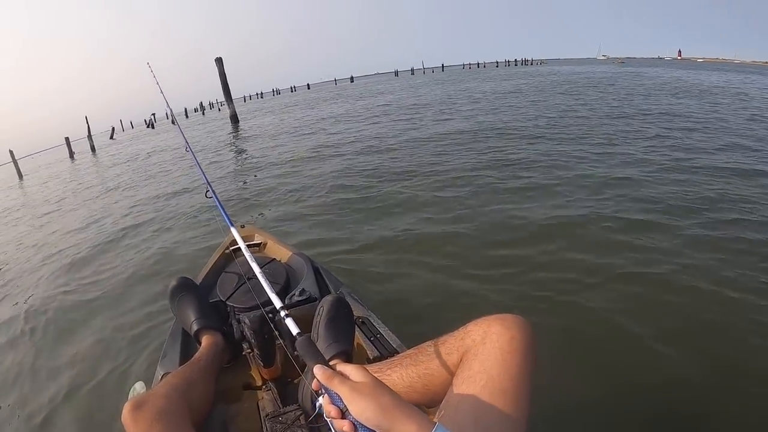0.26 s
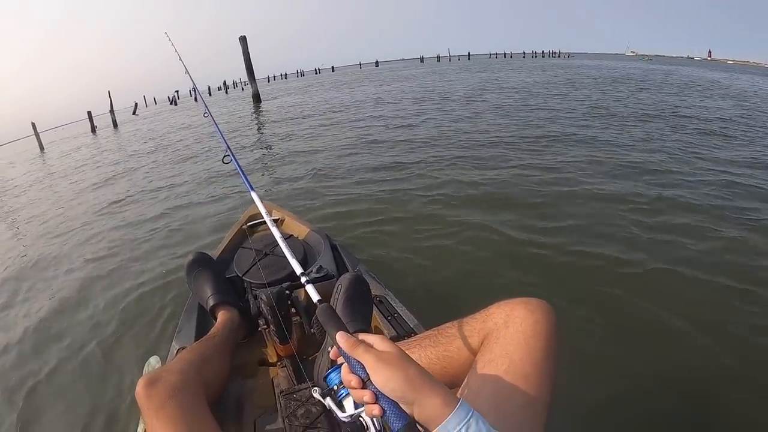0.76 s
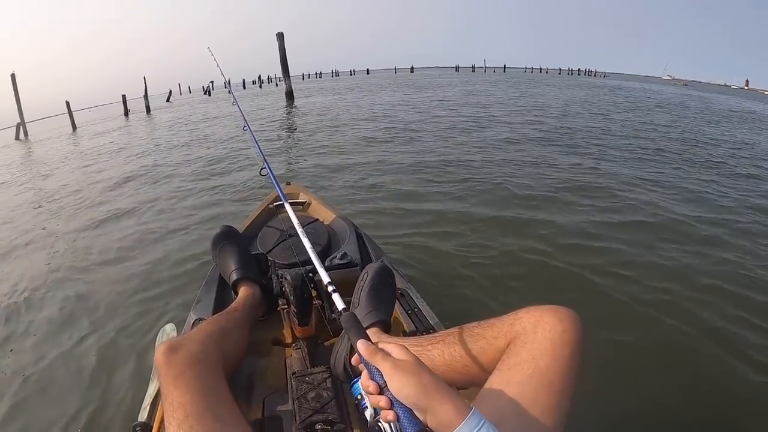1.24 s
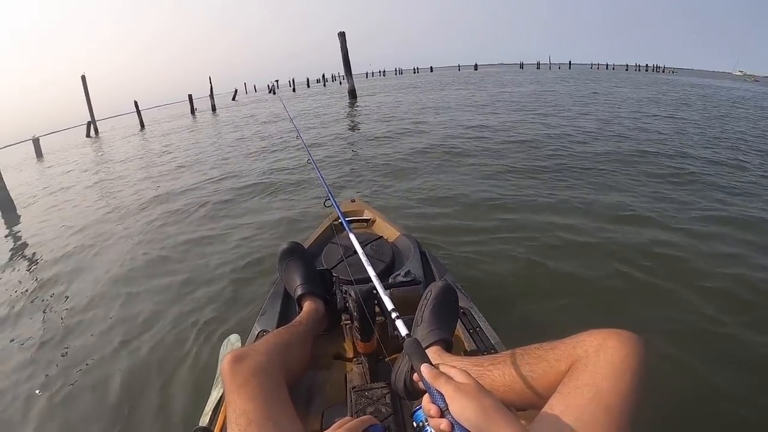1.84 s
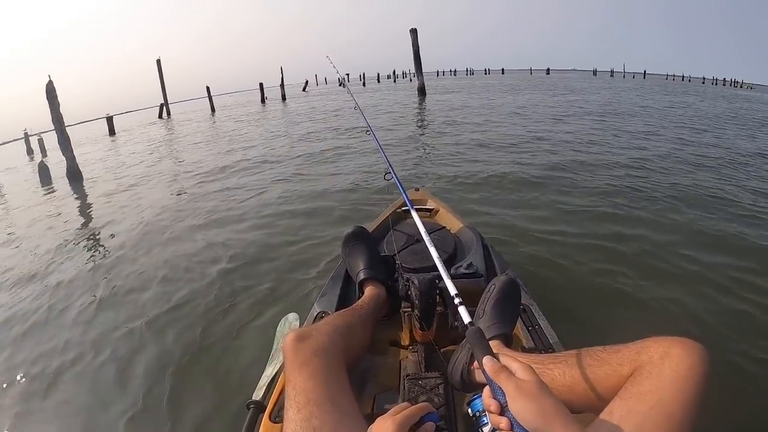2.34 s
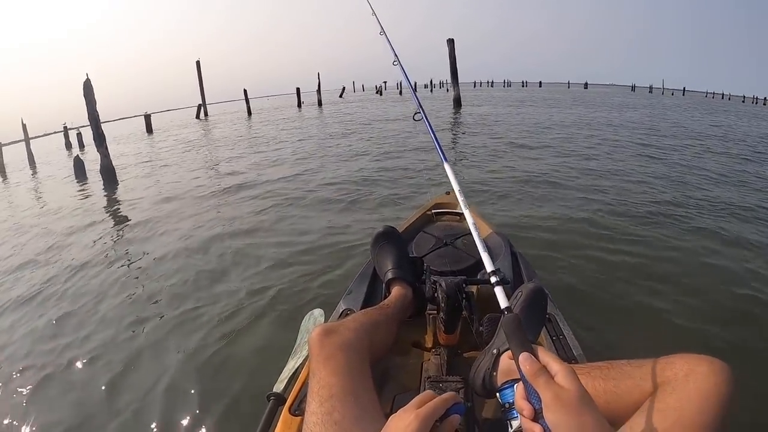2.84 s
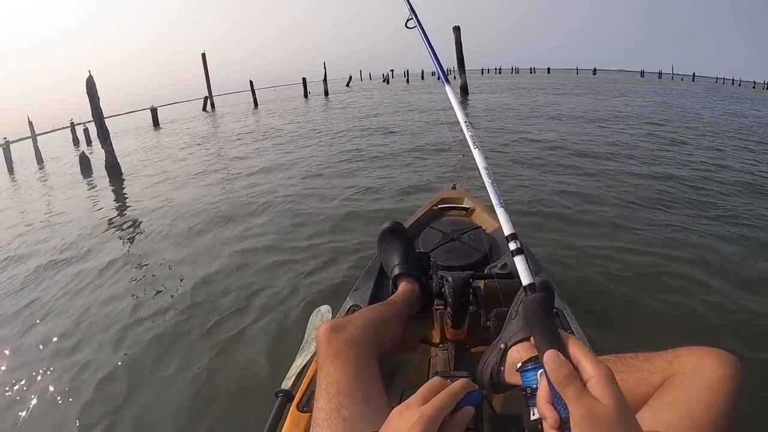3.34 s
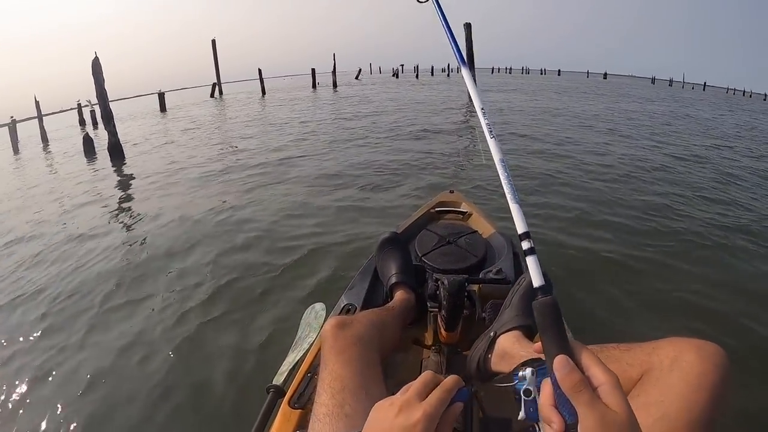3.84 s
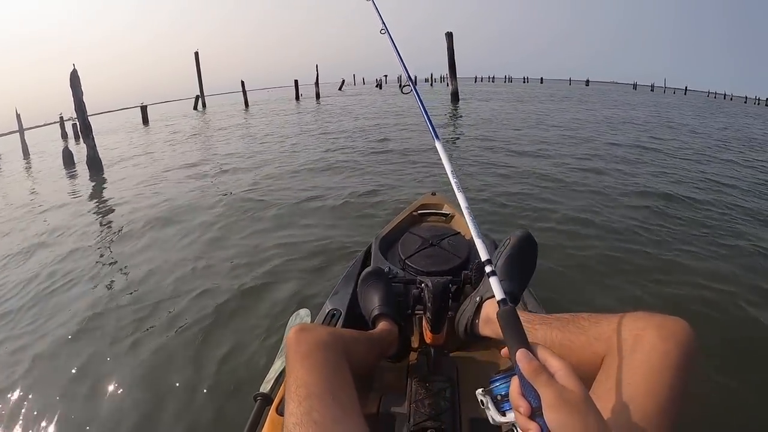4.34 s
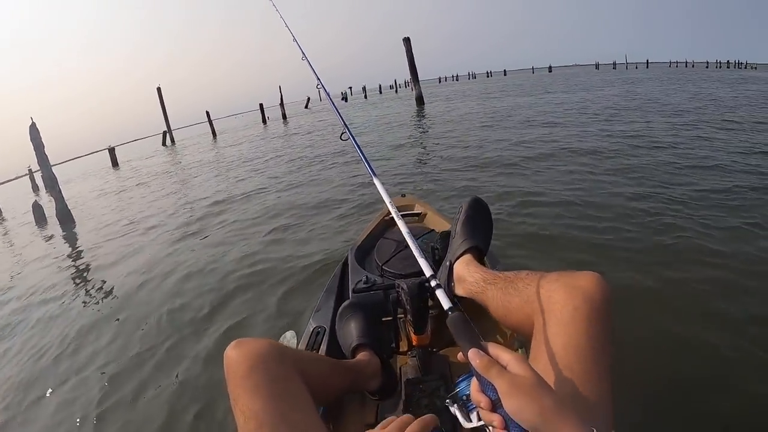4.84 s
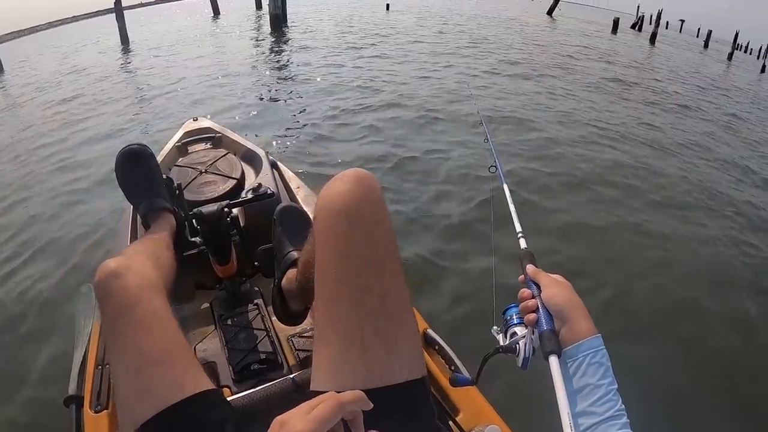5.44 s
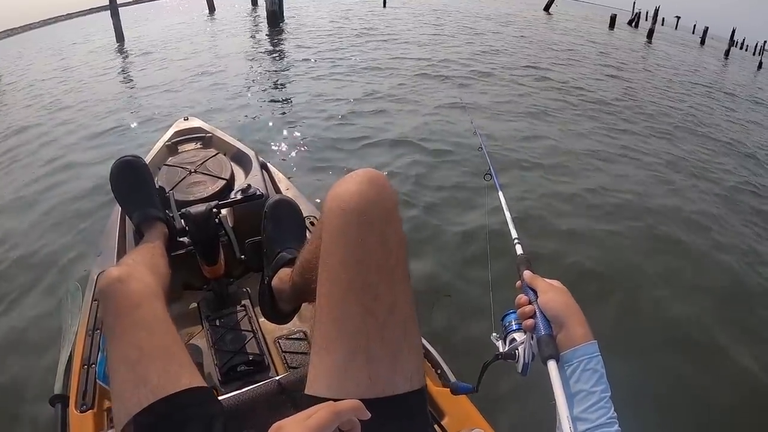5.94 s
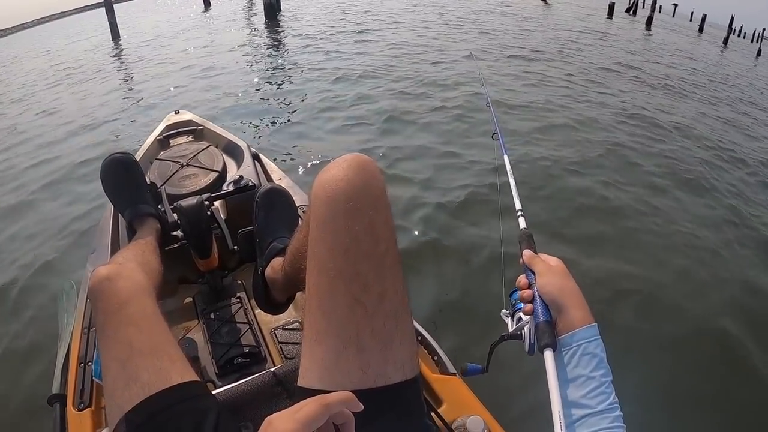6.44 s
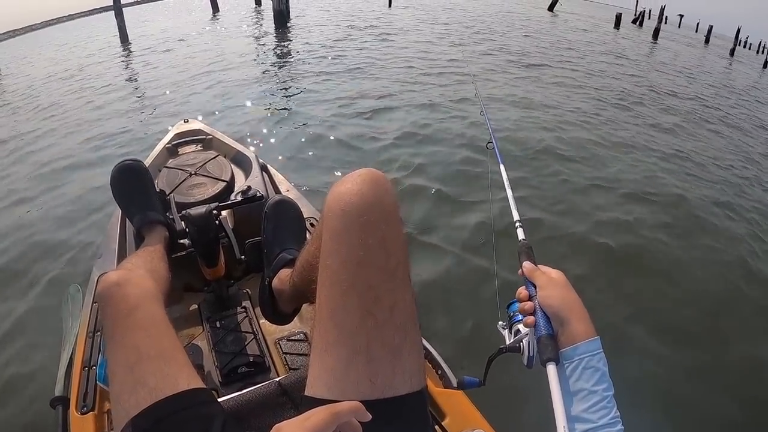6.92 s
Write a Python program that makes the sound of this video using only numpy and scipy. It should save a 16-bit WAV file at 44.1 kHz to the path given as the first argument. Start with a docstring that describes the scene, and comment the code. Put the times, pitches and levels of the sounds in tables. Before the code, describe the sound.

Shrill terns trill and rasp over open water while a shorebird pips steadily, wind rumbles low on the microphone and ripples lap a kayak.

```python
"""Shrill terns call throughout: held notes and trills, whose two voices mix into sum tones and a rasp.
Nasal gulls (filtered harmonics) join after a second; then a whistle swells into a shorebird's sliding pips.
The wind (low noise) drops near 6 s; at the end, throat pulses squawk and a clear tone follows.
All along, bird echoes return from pilings, noisy ripples lap a kayak hull, gear ticks as short
resonant bursts and a far motor hums on two lines."""
import sys
import numpy as np
from scipy import signal
from scipy.fft import rfft, irfft
from scipy.io import wavfile
from scipy.ndimage import uniform_filter1d

SR = 44100
rng = np.random.default_rng(int(sys.argv[2]) if len(sys.argv) > 2 else 0)


def wav_out(sig):
    """Save sig, one row per channel (or a flat mono array), as 16-bit PCM at SR to the path in sys.argv[1]."""
    wavfile.write(sys.argv[1], SR, np.round(np.clip(np.atleast_2d(sig).T, -1, 1) * 32767).astype(np.int16))


N = 316638
TIME_S = np.arange(N) / SR
TOP_HZ = 15700

# Breeze on the microphone. Each row: time in seconds, level before gusts and buffets in dB.
WIND = [(0, -29), (.45, -30.5), (1.5, -30.5), (2.3, -32), (2.7, -29), (4.0, -29.5), (4.8, -31),
        (5.45, -30.5), (5.9, -33.5), (6.1, -38.5), (7.18, -39.5)]
# Wind spectrum. Each row: frequency in Hz, relative density in dB.
WIND_COLOUR = [(18, 17.5), (30, -3), (50, -4.5), (100, -15.5), (200, -30.5), (400, -39), (900, -69.5)]
# Single gusts. Each row: time in seconds, peak above the breeze in dB.
GUSTS = [(.09, 4.5), (.76, 3.5), (1.2, 4.5), (1.72, 5), (2.7, 2), (4.58, 4.5), (5.02, 4.5)]
GUST_S, BUFFETS_PER_S, BUFFET_DB = .06, 12, 1.1

# Ripple spectrum. Each row: frequency in Hz, relative density in dB.
WATER_COLOUR = [(45, 4), (85, 8), (170, -1), (300, -10.5), (600, -16), (1000, -23.5), (1600, -26),
                (2500, -34), (5000, -39), (9000, -39.5), (16000, -37)]
# Hull resonances. Each row: frequency in Hz, width of the first pass in Hz, relative level in dB.
HULL = [(234, 45, 3.5), (319, 64, -3.5), (437, 73, -5), (530, 91, -15)]
# Far motor. Each row: time in seconds, mean level of the lower line in dB, of the upper line in dB.
MOTOR = [(0, -58.5, -62.5), (1.2, -56.5, -74), (2.2, -53.5, -75.5), (3.8, -58, -64), (5.1, -53, -60.5),
         (5.6, -54, -56), (6.4, -56.5, -58), (7.18, -56.5, -62)]
# Knocks, ticks and scuffs of gear and feet. Each row: peak time in seconds, rise in seconds,
# decay in seconds, centre in Hz, width of each of two passes in Hz, level in dB.
KNOCKS = [(.19, 0.037, .03, 5000, 6000, -59), (.312, 0.0032, 0.0085, 273, 195, -41),
          (.312, 0.0028, 0.0087, 1110, 1200, -53.5), (.64, 0.0012, 0.0036, 2480, 4000, -60),
          (1.237, .004, .035, 320, 160, -53), (2.065, 0.00091, .003, 2500, 2500, -56),
          (2.341, .001, .003, 8000, 8000, -65), (3.524, 0.04, .015, 4400, 6000, -59),
          (3.561, 0.0034, 0.012, 700, 910, -49), (3.64, .001, .003, 4000, 5000, -58.5),
          (4.099, 0.0054, 0.013, 4000, 1700, -52), (5.31, 0.0019, 0.017, 265, 170, -41.5),
          (5.976, 0.0044, .025, 199, 91.5, -45.5), (6.021, .001, 0.0033, 5000, 6000, -61)]
# Sleeve brushing as the rod moves. Each row: time in seconds, mean level in dB.
SLEEVE = [(0, -68), (2.5, -72), (4.4, -70.5), (5.0, -68.5), (5.3, -63), (5.6, -66.5), (5.88, -66),
          (6.06, -75), (7.18, -71.5)]

# Bird distance; far birds have more echo. Each row: time in seconds, relative echo level in dB.
DISTANCE = [(.3, -16), (1.0, -12), (1.7, -6), (3.3, -9.5), (5.4, -9.5), (6.7, -16)]
POST_ECHO_S, POST_ECHO_DB = .053, -7.5  # nearest piling, dB relative to the scattered echoes

# Nasal gull notes. Each row: start in seconds, length in seconds, first, middle and last pitch in Hz,
# level in dB, throat resonance in Hz.
GULL_NOTES = [(0.915, 0.022, 1180, 1330, 1380, -60.5, 1500), (1.412, 0.027, 1430, 1420, 1570, -65, 1800),
              (5.251, 0.017, 1213, 1314, 1296, -49, 3480), (5.307, 0.021, 1328, 1300, 1306, -41, 3630),
              (5.473, 0.053, 1270, 1194, 1116, -43, 3700), (6.517, .096, 990, 1210, 930, -60, 2750),
              (7.151, 0.045, 980, 988, 1018, -50.5, 3160)]
# Faint far mews. Each row: start in seconds, length in seconds, first, middle and last pitch in Hz,
# level in dB.
MEWS = [(3.148, 0.073, 500, 532, 480, -60.5), (3.187, 0.061, 660, 666, 630, -62),
        (3.418, 0.065, 1060, 1150, 1100, -53.5), (3.62, 0.085, 444, 458, 413, -56),
        (3.686, 0.045, 1150, 1165, 1150, -59.5), (3.901, 0.063, 465, 458, 408, -59.5),
        (6.98, 0.1, 482, 602, 905, -65.5)]
# Rasping squawk. Each row: time in seconds, mean pulse rate in Hz, level in dB.
SQUAWK = [(7.10, 150, -74), (7.113, 158.4, -51.5), (7.125, 164.6, -46), (7.148, 177.5, -45),
          (7.156, 180, -55)]
# Squawk throat resonances. Each row: frequency in Hz, width in Hz, relative gain in dB.
SQUAWK_THROAT = [(1150, 170, 16.5), (2200, 480, 18), (3400, 620, -3), (5000, 960, -28)]
# Clear tone of the squawk: start in seconds, length in seconds, first, middle and last pitch in Hz.
SQUAWK_TONE = (7.15, .06, 1965, 1975, 1985)

# Shorebird pips. Each row: time of the voice break in seconds, level of the break in dB.
PIPS = [(3.305, -48.5), (3.514, -45), (3.76, -45.5), (4.013, -42), (4.274, -43), (4.543, -44.5),
        (4.803, -40.5), (5.069, -44.5), (5.334, -42.5), (5.599, -43.5), (5.866, -46.5)]
PIP_UPPER_DB, PIP_TIRING_DB = -46.8, -6.5  # first upper note, its change by the last pip
CLUCK_LEAD_S, CLUCK_HZ, CLUCK_DB, CLUCK_TIRING_DB = .13, 1325, -53, -4
# Long whistle: start in seconds, end in seconds, pitch before the sag in Hz, level before the swell in dB.
WHISTLE = (2.806, 3.268, 1330, -56)
# Hoarse low onset of the whistle: start in seconds, length in seconds, middle pitch in Hz, level in dB.
WHISTLE_ONSET = (2.778, .028, 1025, -57)
WHISTLE_SWELL_DB, WHISTLE_SWELL_S = 11.5, .075
WHISTLE_SAG_HZ, WHISTLE_SAG_S = 120, .006

# Single tern notes. Each row: start in seconds, length in seconds, middle pitch in Hz, bend name, level in dB.
TERN_NOTES = [(.241, .02, 4450, "arch", -49), (.578, .042, 3230, "flat", -61.5),
              (.782, .029, 3090, "held", -65), (.911, .016, 2400, "flat", -58),
              (1.1, .023, 2300, "flat", -53), (1.403, .03, 3770, "held", -63),
              (1.622, .056, 4350, "flat", -66.5), (1.74, .22, 4450, "held", -72),
              (2.1, .044, 2700, "held", -65), (2.728, .13, 3510, "flat", -54.5),
              (2.853, .051, 3800, "arch", -52), (2.998, .047, 3780, "arch", -54),
              (3.23, .078, 4330, "rise", -66), (3.345, .056, 4660, "rise", -62.5),
              (3.398, .026, 3700, "slur", -59), (3.478, .072, 4670, "flat", -58.5),
              (3.542, .017, 3550, "slur", -60), (4.55, .05, 3900, "arch", -56.5),
              (4.558, .022, 2570, "slur", -57), (5.98, .038, 3640, "held", -59.5)]
# Pitch bends by name. Each entry: start and end in semitones relative to the middle.
BENDS_ST = {"held": (.9, 0), "stroke": (1.1, 1.2), "drop": (1.2, -.1), "flat": (-.3, -.1),
            "rise": (-.6, .2), "arch": (-1.2, -2), "slur": (1.6, -1.2)}
# Rasping calls. Each row: start, trill start and slur start in seconds, number of strokes, pitch in Hz,
# last stroke in Hz, held note in dB, trill in dB, octave in the trill in relative dB,
# second voice in the held note in relative dB.
RASP_CALLS = [(.254, .324, .433, 4, 3700, 4400, -43.8, -42.3, -15, -1),
              (1.422, 1.511, 1.596, 3, 3640, 4200, -54.5, -50.5, -10, -1.5),
              (4.75, 4.82, 4.92, 3, 3610, 3770, -46.5, -45.5, -24, -6)]
RASP_PERIOD_S, RASP_DUTY, RASP_FADE_DB = .0252, (.74, .4), -6  # duty: sounding share, first and last stroke
SQUEAK_HZ, SQUEAK_S, SQUEAK_DB = 4900, .022, -58
SLUR_S, SLUR_DB = .014, -4.5  # dB relative to the trill
# Clear calls. Each row: start and trill start in seconds, stroke period in seconds, number of strokes,
# trill pitch in Hz, held note in dB, trill in dB, closing arch in dB, octave in the trill in relative dB.
CLEAR_CALLS = [(1.714, 1.79, .0222, 4, 3395, -48.5, -44.5, -48.5, -17),
               (4.348, 4.402, .0226, 5, 3545, -44.8, -44, -51.5, -12.5),
               (6.794, 6.857, .0222, 4, 3620, -44.5, -44, -43.5, -12)]
CLEAR_DUTY, CLEAR_FADE_DB = (.9, .68), -1.5
CLEAR_HELD_ST, CLEAR_CLIMB_ST, ARCH_ST = .42, .5, 1.4  # semitones above the trill
ARCH_S = .058
# Low, slower calls. Each row: start and trill start in seconds, stroke period in seconds,
# number of strokes, held note in Hz, trill pitch approached in Hz, trill level in dB, trill fade in dB,
# first duty 0-1, octave in relative dB.
LOW_CALLS = [(.941, .986, .028, 4, 2335, 2220, -46, 0, .92, -27),
             (5.285, 5.341, .0298, 5, 2615, 2330, -42, -2.5, .52, -2.5),
             (5.524, 5.592, .032, 3, 2270, 2235, -44.5, -9, .99, -32)]
LOW_DUTY_SHRINK, LOW_HELD_DB, LOW_SINK = .53, -1.7, .4
ONE_VOICE_DB, VOICE_FADE_DB = -34, -4  # second voice: trace in clear notes, change per trill stroke
NOTE_OCTAVE_DB = -27


def undb(db):
    """Decibels to gain."""
    return 10 ** (np.asarray(db) / 20)


def unit(x):
    """Scale to rms 1."""
    return x / np.sqrt(np.mean(x ** 2) + 1e-20)


def curves(table):
    """Interpolate each column over time in seconds."""
    s, *columns = np.transpose(table)
    return [np.interp(TIME_S, s, c) for c in columns]


def add(out, s, x):
    """Mix x into out from s seconds on."""
    i = int(np.clip(s * SR, 0, N))
    out[i:i + len(x)] += x[:N - i]


def wander(size, rate_hz):
    """Smooth random curve, spread about 1, redrawn rate_hz times a second."""
    k = max(int(SR / rate_hz), 1)
    held = np.repeat(rng.standard_normal(size // k + 2), k)
    return uniform_filter1d(held, k)[:size] * np.sqrt(3 / 2)


def resonate(x, hz, width_hz):
    """Two-pole resonance with gain 1 at its centre."""
    b, a = signal.iirpeak(min(hz, SR / 3), hz / min(width_hz, SR / 4), fs=SR)
    return signal.lfilter(b, a, x)


def resonate_twice(x, hz, width_hz):
    """Two equal resonances in series, for steeper skirts."""
    return resonate(resonate(x, hz, width_hz), hz, width_hz)


def coloured(points):
    """Noise, rms 1, shaped by (Hz, dB) points and cut below the first."""
    hz, db = np.transpose(points)
    f = np.arange(N // 2 + 1) * SR / N + 1e-3
    low_cut = 1 / np.sqrt(1 + (hz[0] / f) ** 6)
    gain = undb(np.interp(np.log(f), np.log(hz), db)) * low_cut
    return unit(irfft(rfft(rng.standard_normal(N)) * gain, N))


def wind():
    """Low noise: a breeze buffets the microphone, swells in gusts and drops near the end."""
    breeze_db, = curves(WIND)
    gust_db = sum(db * np.exp(-((TIME_S - s) / GUST_S) ** 2) for s, db in GUSTS)
    return coloured(WIND_COLOUR) * undb(breeze_db + gust_db + BUFFET_DB * wander(N, BUFFETS_PER_S))


def water(laps_per_s=6, drops_per_s=22, lap_db=-65):
    """Ripple noise, wavelets ringing the hull, and drops as short damped sines."""
    wash = coloured(WATER_COLOUR) * undb(-51.5 + 0.26 * wander(N, 2.62) + 0.76 * wander(N, 16))
    wavelets = (rng.random(N) < laps_per_s / SR) * rng.uniform(0.53, 1, N)
    swash = signal.fftconvolve(wavelets, np.hanning(int(.06 * SR)))[:N] * rng.standard_normal(N)
    laps = 0
    for hz, width_hz, db in HULL:
        laps = laps + undb(db) * resonate(resonate(swash, hz, width_hz), hz, 3 * hz / 4)
    drops = np.zeros(N)
    t = np.arange(SR // 50) / SR
    for when, pitch, size in rng.random((int(drops_per_s * N / SR), 3)):
        hz = 700 * 8 ** pitch
        ring = np.sin(2 * np.pi * hz * t) * np.exp(-hz * t / 5)
        add(drops, when * N / SR, undb(-70.5 + 13 * size ** 2) * ring)
    return wash + undb(lap_db) * unit(laps) + drops


def motor(low_hz=130, high_hz=199):
    """Two wavering sine lines of a far boat engine, the upper one less steady."""
    out = 0
    for hz, waver, db in zip((low_hz, high_hz), (.008, .04), curves(MOTOR)):
        phase = 2 * np.pi * np.cumsum(hz * (1 + waver * wander(N, 20))) / SR
        out = out + np.sqrt(2) * undb(db + 2 * wander(N, 9.8)) * np.sin(phase)
    return out


def gear():
    """Short resonant noise bursts for knocks and scuffs on the plastic hull; broad noise for a sleeve."""
    out = np.zeros(N)
    t = np.arange(SR // 2) / SR - 1 / 4
    for s, rise_s, decay_s, hz, width_hz, db in KNOCKS:
        envelope = np.exp(-np.abs(t) / np.where(t < 0, rise_s, decay_s))
        ring = unit(resonate_twice(rng.standard_normal(len(t)), hz, width_hz))
        knock = undb(db) * envelope * ring
        add(out, max(s + t[0], 0), knock[t >= -s])
    sleeve_db, = curves(SLEEVE)
    brushing = unit(resonate(rng.standard_normal(N), 2700, 6000))
    return out + undb(sleeve_db + 0.97 * wander(N, 90)) * brushing


def pilings(x, t60_s=0.46, delay_s=0.005, row_s=0.23, row_spread_s=0.047, row_gain=0.12):
    """Scattered echoes from waves and posts, with a late cluster from the far row of pilings."""
    t = np.arange(SR) / SR
    tail = undb(-60 * t / t60_s) * (1 - np.exp(-t / delay_s))
    far_row = row_gain * np.exp(-((t - row_s) / row_spread_s) ** 2)
    sparse = rng.standard_normal(SR) * (rng.random(SR) < .03)
    echoes = resonate(sparse * (tail + far_row), 2530, 6700)
    echo_db, = curves(DISTANCE)
    wet = signal.fftconvolve(x * undb(echo_db), echoes / np.sqrt(np.sum(echoes ** 2)))[:N] / 2
    add(wet, POST_ECHO_S, x * undb(echo_db + POST_ECHO_DB) / 2)
    # the moving surface makes the echoes flutter
    return wet * undb(2 * wander(N, 120))


def above(hz, semitones):
    """A pitch some semitones higher."""
    return hz * 2 ** (np.asarray(semitones) / 12)


def rasp(size, hz, width_hz):
    """Turbulent noise in a bird's throat, rms 1."""
    return unit(resonate_twice(rng.standard_normal(size), hz, width_hz))


def harmonics(phase, levels_db):
    """Partials at whole multiples of a phase."""
    return sum(undb(db) * np.sin((k + 1) * phase) for k, db in enumerate(levels_db))


def syrinx(length_s, first_hz, middle_hz, last_hz, edge_s=.004, jitter=.005, shimmer_db=1.5,
           rate_hz=500, swell=0.092, hook=0.):
    """Phase and envelope of one note: pitch drops from a hook, bends through three points and trembles."""
    size = int((length_s + edge_s / 2) * SR)
    u, t = np.linspace(0, 1, size), np.arange(size) / SR
    bend_hz = np.polyval(np.polyfit([0, .5, 1], [first_hz, middle_hz, last_hz], 2), u)
    hz = bend_hz * (1 + hook * np.exp(-t / 0.00249))
    phase = 2 * np.pi * np.cumsum(hz * (1 + jitter * wander(size, rate_hz))) / SR
    ramp = np.clip(np.minimum(t, t[-1] - t) / edge_s, 0, 1)
    # long notes swell in more slowly
    pressure = 1 - np.exp(-u / (swell * np.sqrt(length_s * 10)))
    shimmer = undb(shimmer_db * wander(size, rate_hz))
    return phase, np.sqrt(2) * np.sin(ramp * np.pi / 2) ** 2 * pressure * shimmer


def gulls(throat_width=0.34, even_db=5, fundamental_db=-16):
    """Nasal harmonics through a broad throat resonance, and far mews dulled to near sines."""
    out, order = np.zeros(N), np.arange(1, 7)
    for s, length_s, first_hz, middle_hz, last_hz, db, throat_hz in GULL_NOTES:
        # long notes have softer edges
        phase, envelope = syrinx(length_s, first_hz, middle_hz, last_hz,
                                 edge_s=.003 + 2.2 * length_s ** 2, jitter=0.006, swell=0.084)
        detuning = np.log(order * middle_hz / throat_hz) / throat_width
        throat_db = -10 * np.log10(1 + detuning ** 4) + even_db * (order % 2 == 0)
        # a low, open throat lets more of the fundamental through
        fundamental = undb(fundamental_db) * (4000 / throat_hz) ** 4 * np.sin(phase)
        voice = harmonics(phase, throat_db) + fundamental
        add(out, s, undb(db) * envelope * unit(voice) / np.sqrt(2))
    for s, length_s, first_hz, middle_hz, last_hz, db in MEWS:
        phase, envelope = syrinx(length_s, first_hz, middle_hz, last_hz,
                                 edge_s=0.017, jitter=0.019, shimmer_db=1.5, rate_hz=190)
        add(out, s, undb(db) * envelope * harmonics(phase, [0, -20]))
    return out


def squawk(tone_db=-42):
    """Slow uneven pulses ring the throat resonances; a bright steady tone follows."""
    pulse_hz, db = curves(SQUAWK)
    cycles = np.floor(np.cumsum(pulse_hz * (1 + .04 * wander(N, 150))) / SR)
    pulses = np.diff(cycles, prepend=0) + 0.057 * rng.standard_normal(N)
    throat = sum(undb(gain_db) * resonate(pulses, hz, width_hz) for hz, width_hz, gain_db in SQUAWK_THROAT)
    # the beak rounds off the top of each pulse
    throat = signal.sosfilt(signal.butter(2, 6500, fs=SR, output="sos"), throat)
    out = unit(throat) * undb(db) * (TIME_S > SQUAWK[0][0]) * (TIME_S < SQUAWK[-1][0])
    s, *note = SQUAWK_TONE
    phase, envelope = syrinx(*note, edge_s=.004, jitter=.002, shimmer_db=.5, swell=.04)
    add(out, s, undb(tone_db) * envelope * harmonics(phase, [1.5, -9, -17, -19, -30]))
    return out


def whistle():
    """A hoarse onset jumps to a steady whistle, which swells and sags just before it ends."""
    out = np.zeros(N)
    start_s, end_s, hz, db = WHISTLE
    left_s = np.maximum(end_s - TIME_S, 0)
    pitch_hz = hz - WHISTLE_SAG_HZ * np.exp(-left_s / WHISTLE_SAG_S)
    db = db + WHISTLE_SWELL_DB * np.exp(-left_s / WHISTLE_SWELL_S)
    tremor = 0.004 * wander(N, 150) + .004 * wander(N, 14)
    phase = 2 * np.pi * np.cumsum(pitch_hz * (1 + tremor)) / SR
    sounding = np.clip(np.minimum(TIME_S - start_s, left_s) / .008, 0, 1)
    # the octave grows as the bird pushes harder
    octave_db = np.minimum(-8 + 1.2 * (db + 53), -9)
    out += np.sqrt(2) * sounding * undb(db + .5 * wander(N, 60)) * harmonics(phase, [0, octave_db])
    s, length_s, hz, db = WHISTLE_ONSET
    phase, envelope = syrinx(length_s, *above(hz, [-.7, 0, .7]), jitter=.02)
    add(out, s, undb(db) * envelope * harmonics(phase, [0, -11, -14]))
    return out


def shorebird():
    """Pips slide down and break to a hoarse lower register; a soft cluck precedes all but the first."""
    out = np.zeros(N)
    clean, rough = .004, .02
    for (s, break_db), progress in zip(PIPS, np.linspace(0, 1, len(PIPS))):
        upper_db = PIP_UPPER_DB + PIP_TIRING_DB * progress ** 3
        phase, envelope = syrinx(0.0424, 1962, 1762, 1715, edge_s=0.0034, jitter=clean,
                                 shimmer_db=1.2, swell=0.24)
        add(out, s - .041, undb(upper_db) * envelope * harmonics(phase, [0, -18]))
        phase, envelope = syrinx(0.0097, 1370, 1217, 1080, edge_s=0.0048, jitter=rough, shimmer_db=1.5)
        add(out, s - .006, undb(break_db) * envelope * harmonics(phase, [0, -22, -26]))
        phase, envelope = syrinx(0.029, 1083, 960, 910, edge_s=0.0033, jitter=rough, shimmer_db=0.5)
        fading = undb(np.linspace(0, -14, len(phase)))
        hoarse = harmonics(phase, [-1, -3.5, -8.5, -13.5]) + 0.64 * rasp(len(phase), 1130, 950)
        add(out, s + 0.00284, undb(break_db - 7) * envelope * fading * hoarse)
    for (s, _), progress in zip(PIPS[1:], np.linspace(0, 1, len(PIPS) - 1)):
        phase, envelope = syrinx(0.0264, 0.833 * CLUCK_HZ, .98 * CLUCK_HZ, 1.02 * CLUCK_HZ,
                                 edge_s=0.0092, jitter=rough, shimmer_db=3.0, rate_hz=1200)
        husky = np.sin(phase) + .4 * rasp(len(phase), 1.1 * CLUCK_HZ, 900)
        add(out, s - CLUCK_LEAD_S, undb(CLUCK_DB + CLUCK_TIRING_DB * progress) * envelope * husky)
    return out


def trill(s, period_s, pitches_hz, db, fade_db, duty, bend, octave_db, second_db):
    """Evenly spaced strokes that shorten; the last weaken, and the second voice dies away."""
    for k, (hz, u) in enumerate(zip(pitches_hz, np.linspace(0, 1, len(pitches_hz)))):
        length_s = period_s * np.clip(np.interp(u, [0, 1], duty), .2, 1)
        stroke_db = db + fade_db * u ** 4
        yield s + k * period_s, length_s, hz, bend, stroke_db, octave_db, second_db + VOICE_FADE_DB * (k + 1)


def rasping_calls():
    """A two-voiced held note, a trill, a squeak and a down-slur."""
    for s, trill_s, slur_s, strokes, hz, last_hz, held_db, db, octave_db, second_db in RASP_CALLS:
        pitches_hz = [hz] * (strokes - 1) + [last_hz]
        yield s, trill_s - s - .004, hz, "held", held_db, octave_db - 2, second_db
        yield from trill(trill_s, RASP_PERIOD_S, pitches_hz, db, RASP_FADE_DB, RASP_DUTY, "stroke",
                         octave_db, second_db)
        yield slur_s - SQUEAK_S, SQUEAK_S, SQUEAK_HZ, "drop", SQUEAK_DB, NOTE_OCTAVE_DB, ONE_VOICE_DB
        yield slur_s, SLUR_S, above(hz, -.45), "slur", db + SLUR_DB, octave_db + 4, ONE_VOICE_DB


def clear_calls():
    """A held note, a trill with a higher last stroke and a closing arch, nearly one-voiced."""
    for s, trill_s, period_s, strokes, hz, held_db, db, arch_db, octave_db in CLEAR_CALLS:
        pitches_hz = [hz] * (strokes - 1) + [above(hz, CLEAR_CLIMB_ST)]
        held_hz, arch_hz = above(hz, CLEAR_HELD_ST), above(hz, ARCH_ST)
        arch_s = trill_s + strokes * period_s - .004
        yield s, trill_s - s, held_hz, "held", held_db, octave_db - 2.5, ONE_VOICE_DB
        yield from trill(trill_s, period_s, pitches_hz, db, CLEAR_FADE_DB, CLEAR_DUTY, "stroke",
                         octave_db, ONE_VOICE_DB)
        yield arch_s, ARCH_S, arch_hz, "arch", arch_db, octave_db - 1.5, ONE_VOICE_DB


def low_calls():
    """A held note sinks into a slower trill, each stroke closer to the trill pitch."""
    for s, trill_s, period_s, strokes, held_hz, hz, db, fade_db, duty, octave_db in LOW_CALLS:
        pitches_hz = hz + (held_hz - hz) * LOW_SINK ** (1 + np.arange(strokes))
        held_s = trill_s - s - period_s * (1 - min(duty, 1)) - .003
        yield s, held_s, held_hz, "drop", db + LOW_HELD_DB, octave_db, ONE_VOICE_DB
        yield from trill(trill_s, period_s, pitches_hz, db, fade_db, (duty, duty * LOW_DUTY_SHRINK), "drop",
                         octave_db, ONE_VOICE_DB)


def tern_notes():
    """All notes: start s, length s, pitch Hz, bend, level dB, octave dB, second voice dB."""
    yield from rasping_calls()
    yield from clear_calls()
    yield from low_calls()
    for row in TERN_NOTES:
        yield *row, NOTE_OCTAVE_DB, ONE_VOICE_DB


def terns(second_ratio=.738, sum_db=-7, difference_db=-19, breath_db=-28, harsh_db=-13.3, scrape_db=-15,
          tremor=0.0076, flick_st=5.5, flick_db=-16, join_s=.011, hook=.14, scrape_s=.008):
    """Shrill notes; where both sides of the syrinx sound, their pitches mix into sum tones and a rasp."""
    out = np.zeros(N)
    for s, length_s, middle_hz, bend, db, octave_db, second_db in tern_notes():
        first_hz, last_hz = above(middle_hz, BENDS_ST[bend])
        two_voiced = undb(second_db)
        hooked = 3000 < middle_hz < 4100 and bend != "stroke"
        phase, envelope = syrinx(length_s, first_hz, middle_hz, last_hz, edge_s=0.005, jitter=tremor,
                                 shimmer_db=0.44, rate_hz=900, swell=0.14, hook=hook * hooked)
        size = len(phase)
        second = second_ratio * phase + 0.26 * wander(size, 300)
        main = harmonics(phase, [0, octave_db, 2.7 * octave_db - 9.5])
        mixed = np.sin(second) + undb(sum_db) * np.sin(phase + second)
        mixed += undb(difference_db) * np.sin(2 * phase - second)
        mixed += undb(-32) * np.sin(2 * phase + second)
        # in a held note the second voice joins a moment after the first
        if bend == "held":
            mixed *= 1 - np.exp(-(np.arange(size) / SR / join_s) ** 2)
        noise_gain = (undb(harsh_db) * two_voiced + undb(breath_db)) / np.sqrt(2)
        noise = noise_gain * rasp(size, 1.05 * middle_hz, 5000)
        # a random rattle deepens with the second voice
        envelope = envelope * (1 + .3 * min(two_voiced, 1) ** .5 * wander(size, 1500))
        add(out, s - .0015, undb(db) * envelope * (main + two_voiced * mixed + noise))
        # short notes end in a scrape as the membranes close
        if length_s < .026:
            closing = np.hanning(int(scrape_s * SR))
            scrape = closing * rasp(len(closing), 0.99 * middle_hz, 0.72 * middle_hz)
            add(out, s + length_s - .005, undb(db + scrape_db) * scrape)
        # after each high stroke the voice flicks upwards
        if bend == "stroke":
            flick_hz = above(middle_hz, [flick_st - 2, flick_st, flick_st])
            phase, envelope = syrinx(scrape_s, *flick_hz, jitter=.02, rate_hz=900)
            add(out, s + length_s - .002, undb(db + flick_db) * envelope * np.sin(phase))
    return out


def scene():
    """Birds and their echoes over boat, water and wind."""
    birds = terns() + whistle() + shorebird() + gulls() + squawk()
    return (birds + pilings(birds) + gear() + water() + wind() + motor())[None]


def record(dry):
    """Fade in over 5 ms, then low-pass steeply at TOP_HZ."""
    opening = np.sin(np.pi / 2 * np.minimum(TIME_S / .005, 1)) ** 2
    return signal.sosfilt(signal.ellip(10, .2, 70, TOP_HZ, fs=SR, output="sos"), dry * opening)


dry = scene()
out = record(dry)
wav_out(out)
```